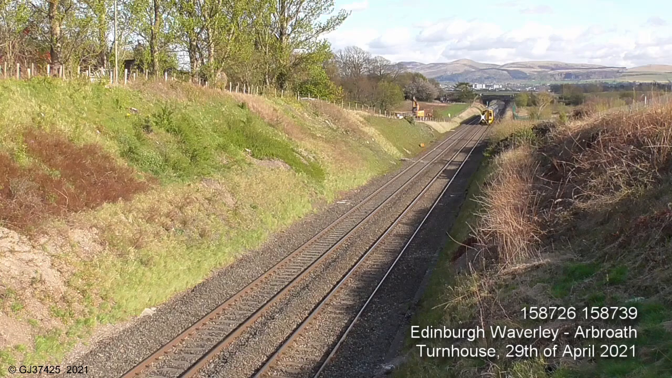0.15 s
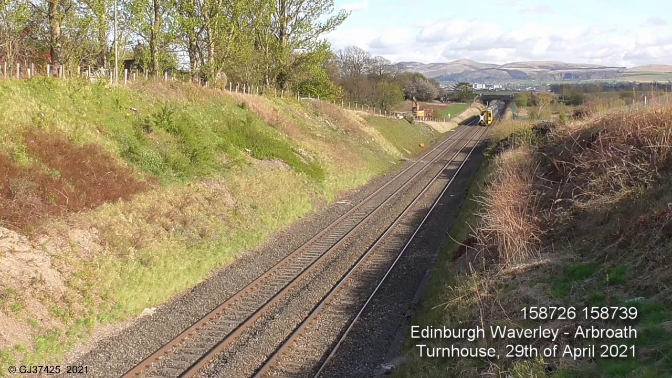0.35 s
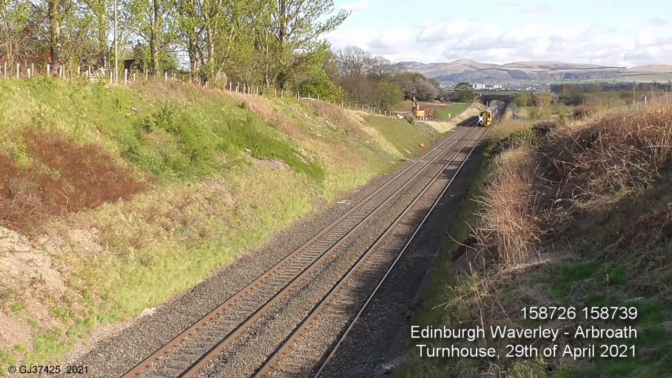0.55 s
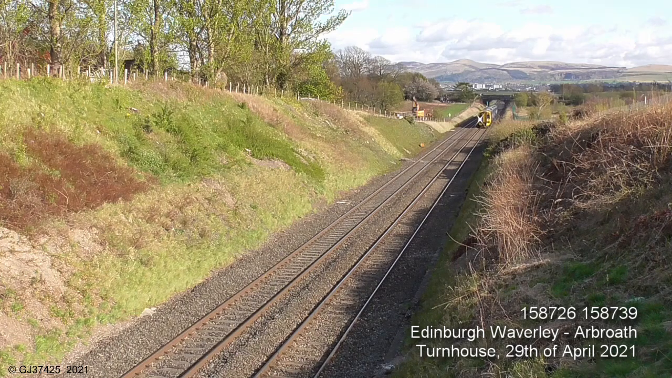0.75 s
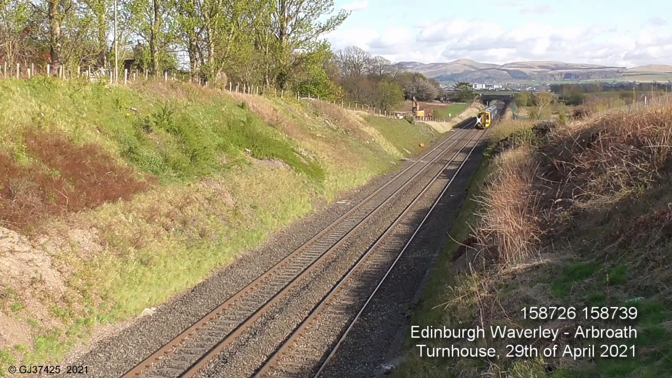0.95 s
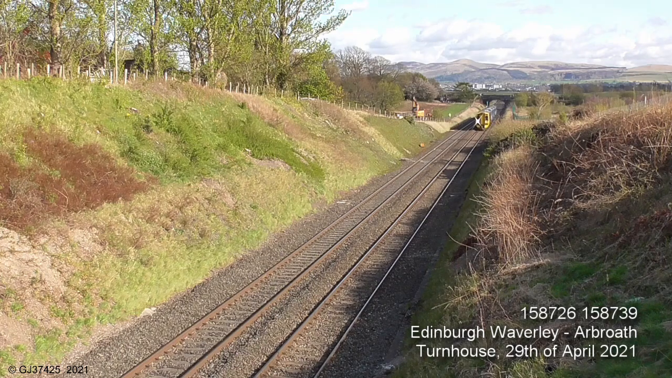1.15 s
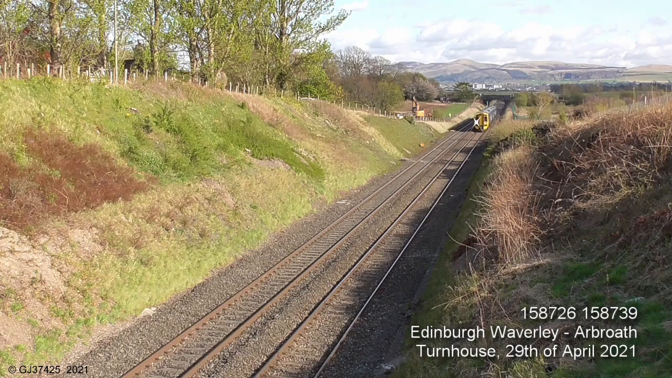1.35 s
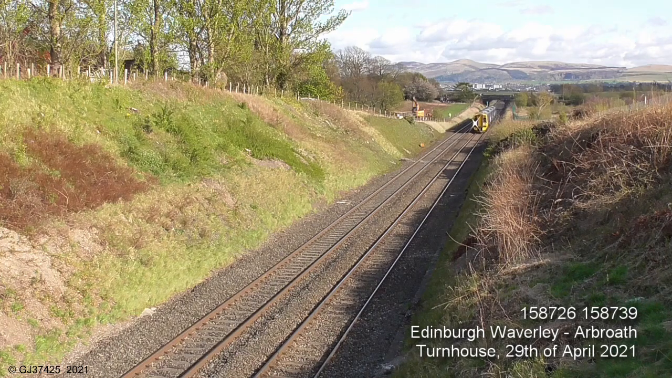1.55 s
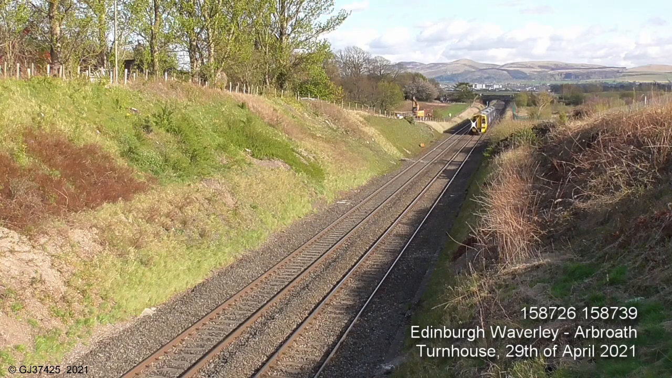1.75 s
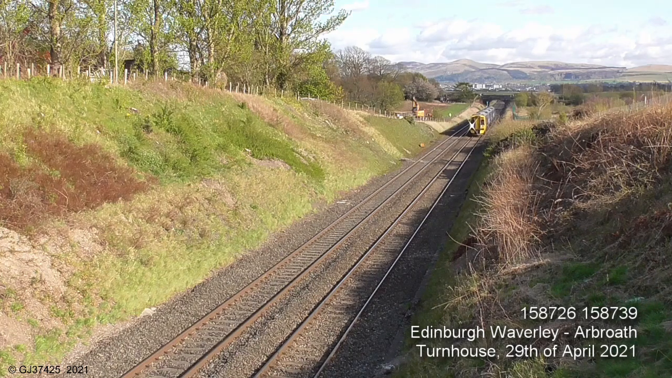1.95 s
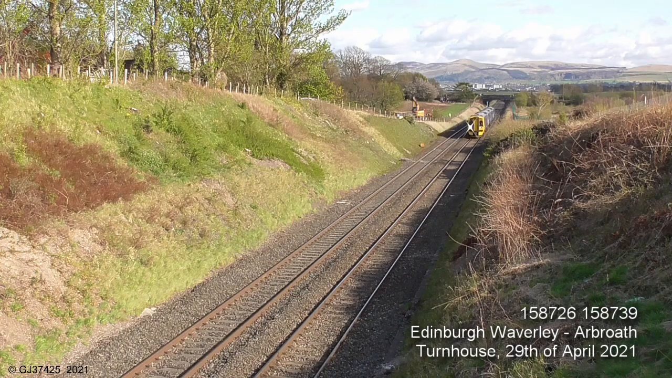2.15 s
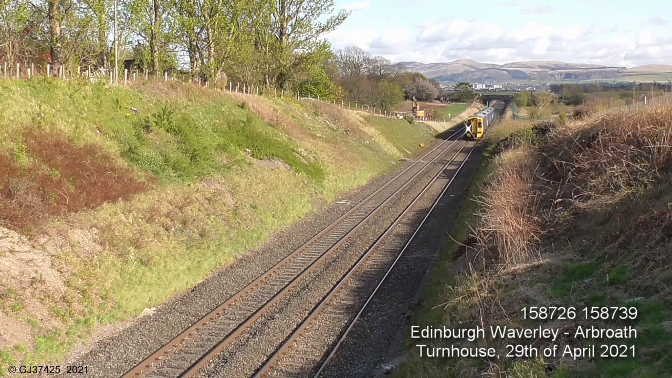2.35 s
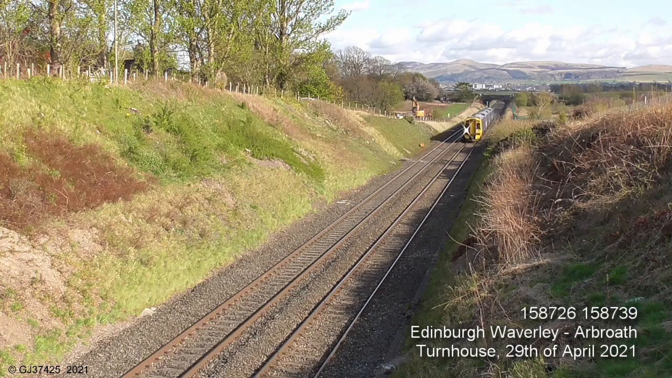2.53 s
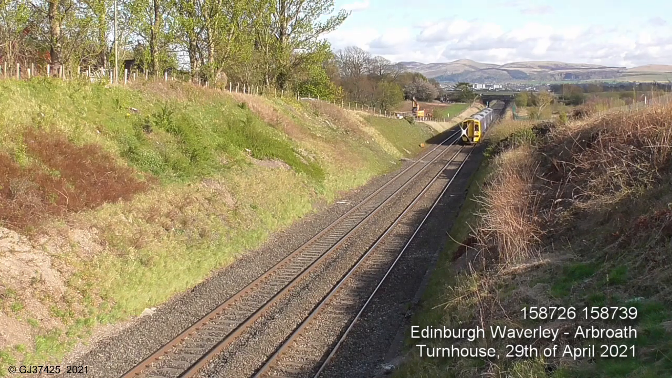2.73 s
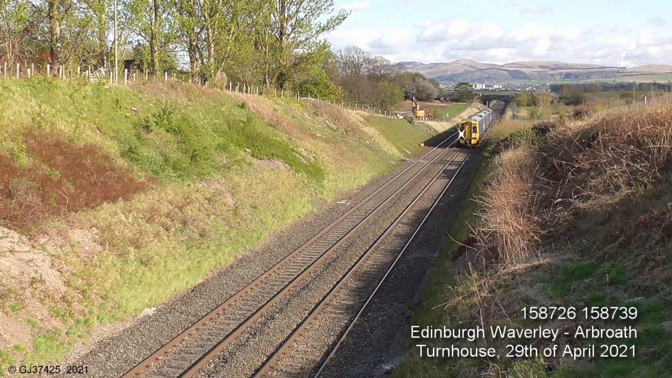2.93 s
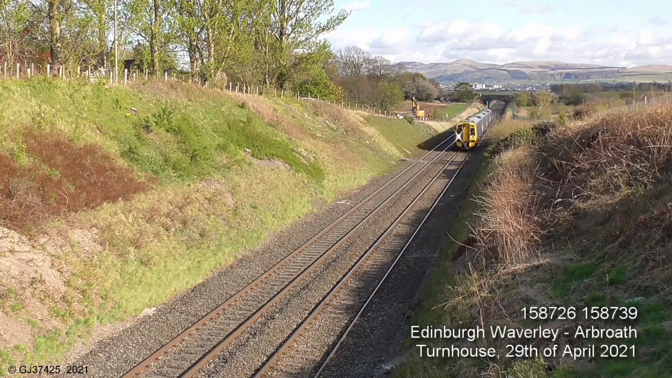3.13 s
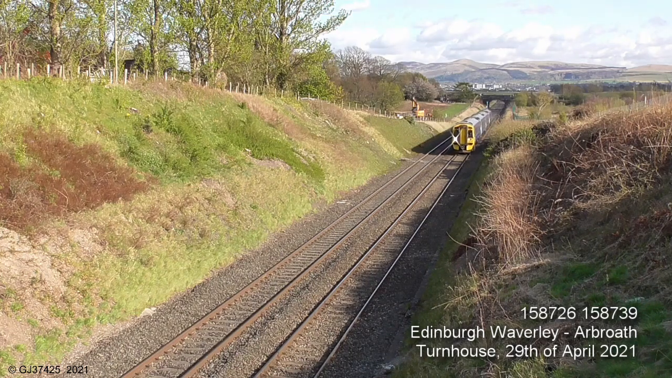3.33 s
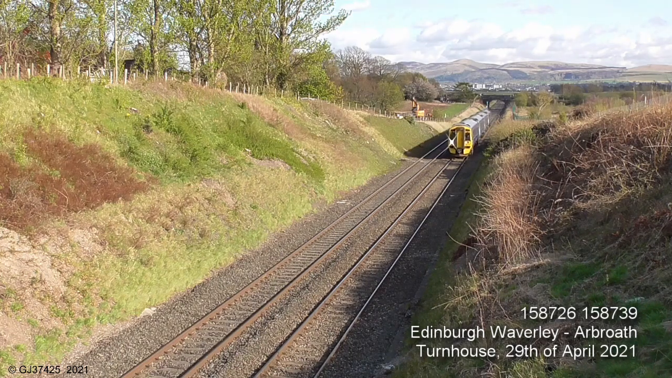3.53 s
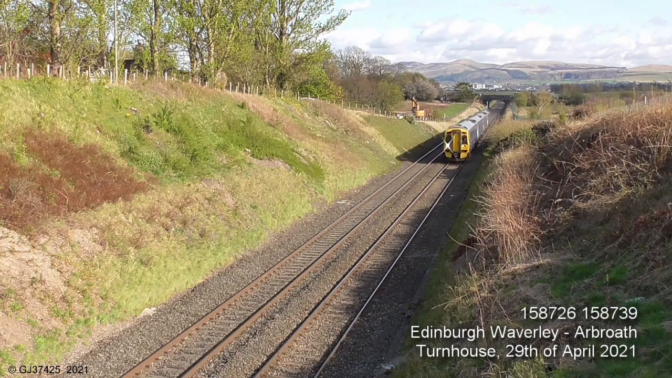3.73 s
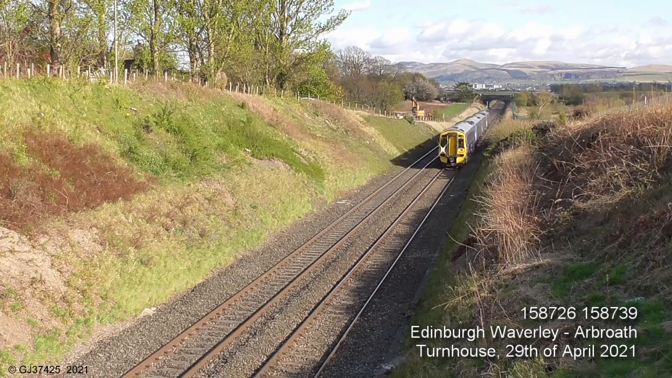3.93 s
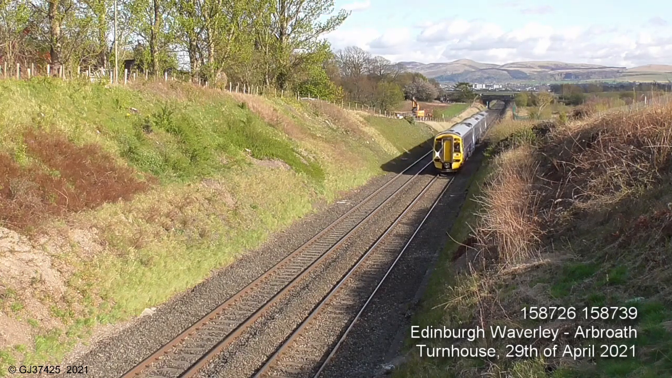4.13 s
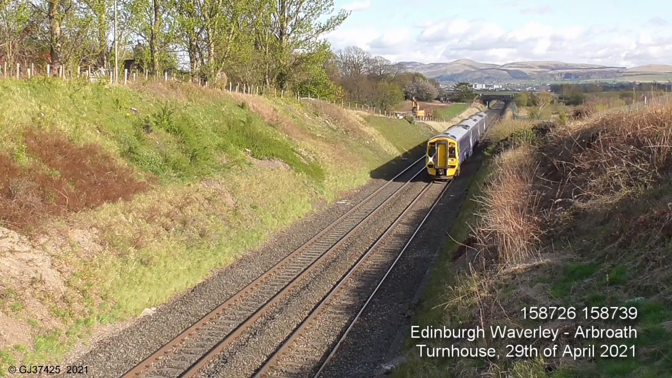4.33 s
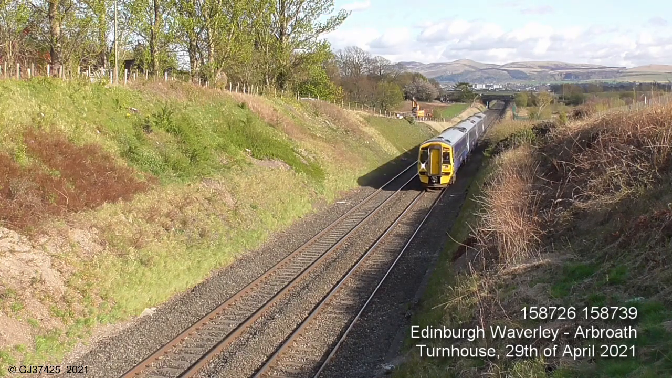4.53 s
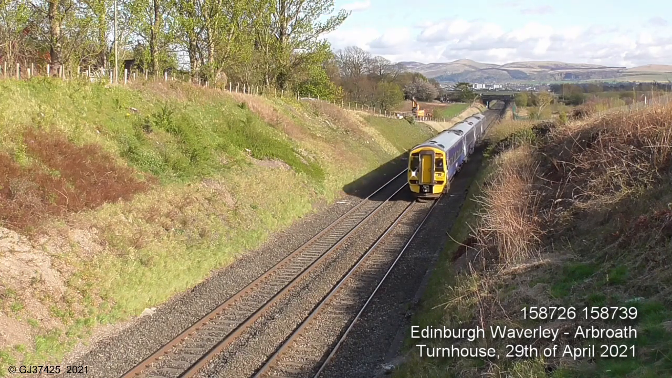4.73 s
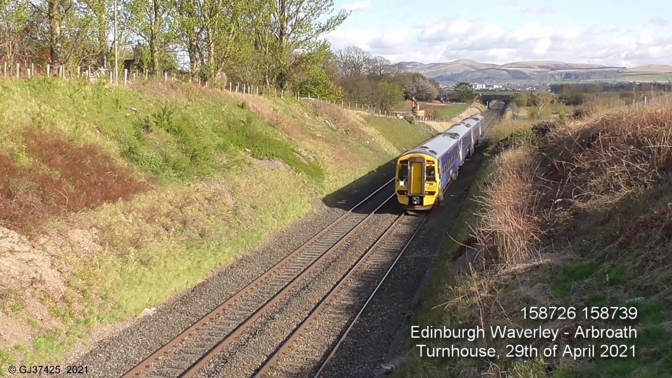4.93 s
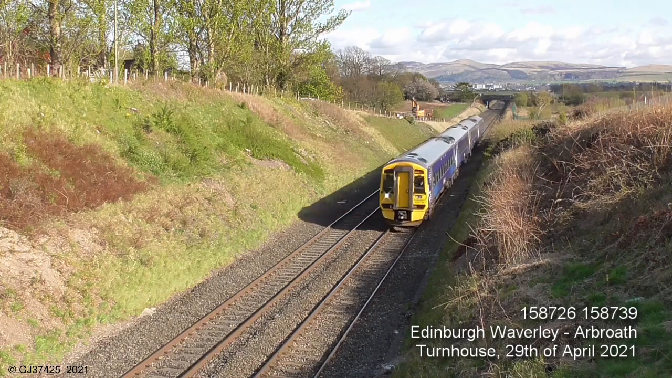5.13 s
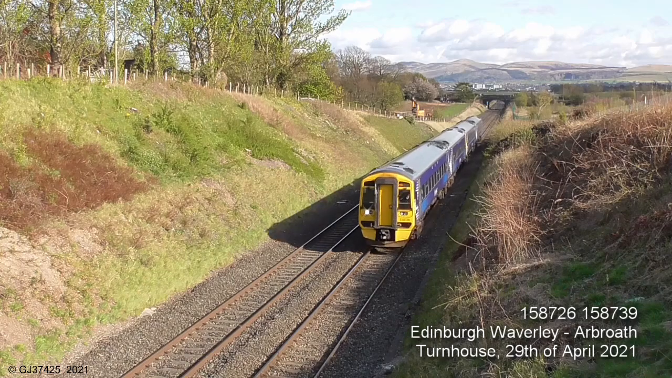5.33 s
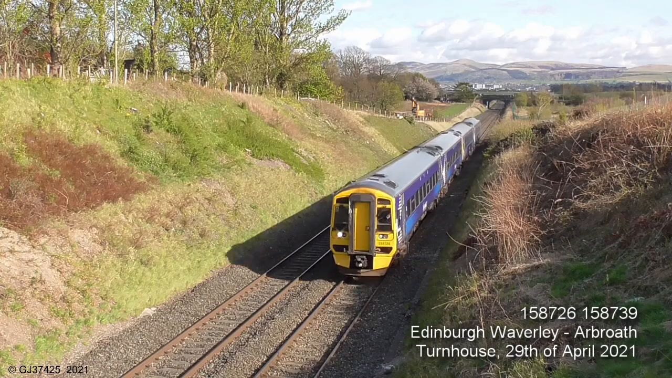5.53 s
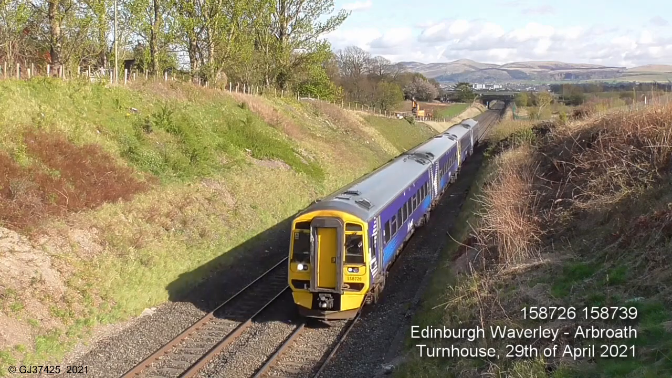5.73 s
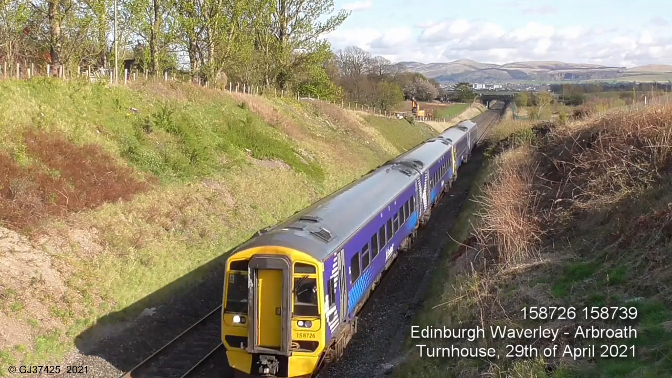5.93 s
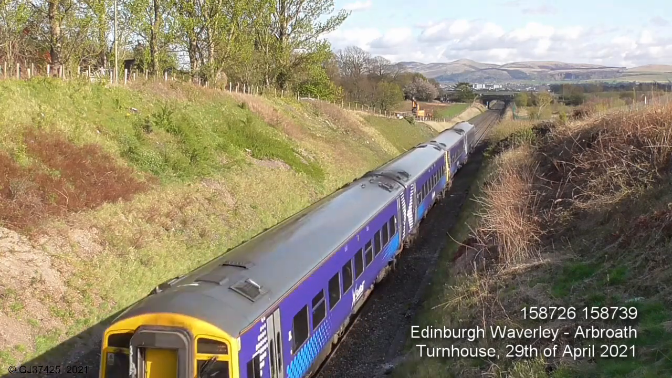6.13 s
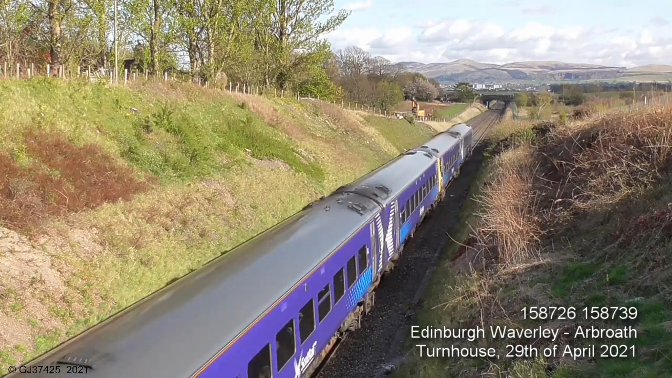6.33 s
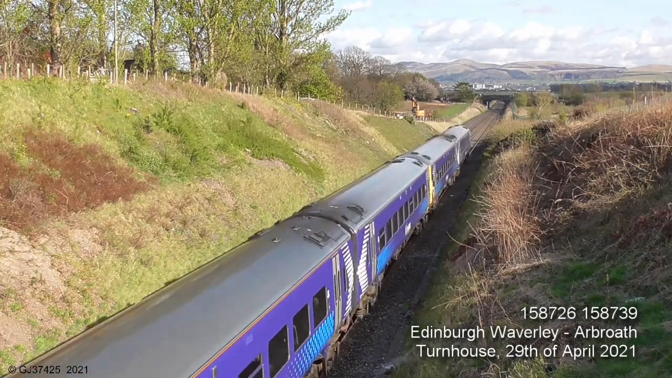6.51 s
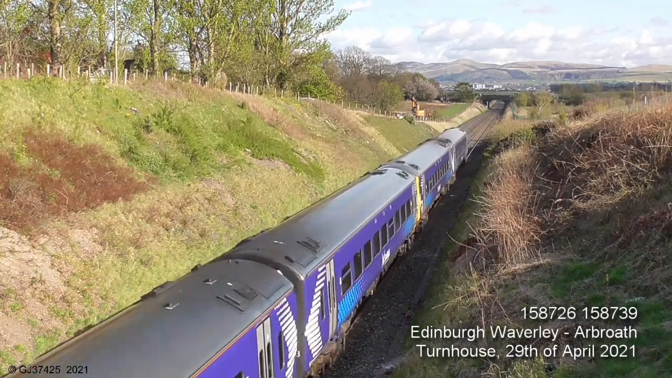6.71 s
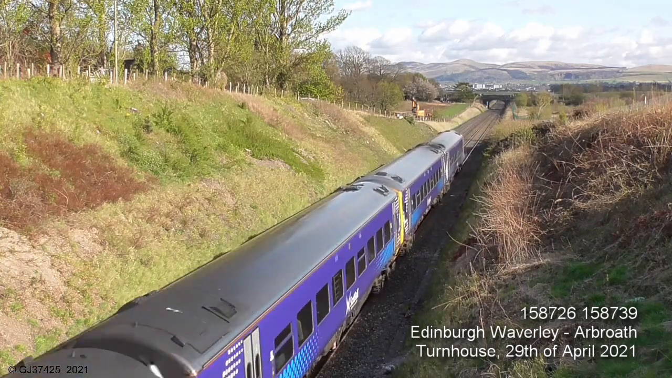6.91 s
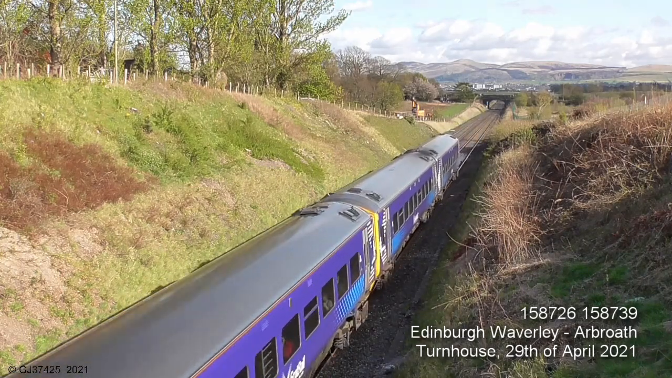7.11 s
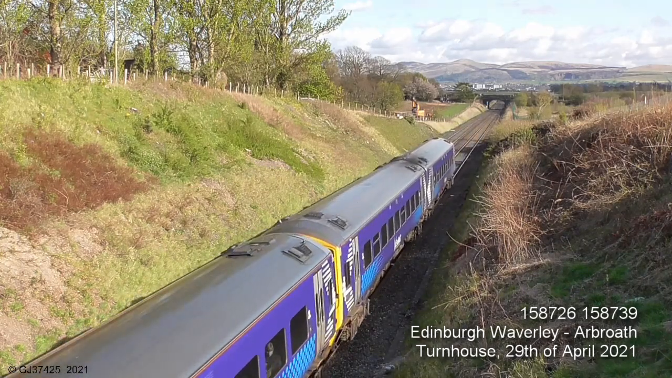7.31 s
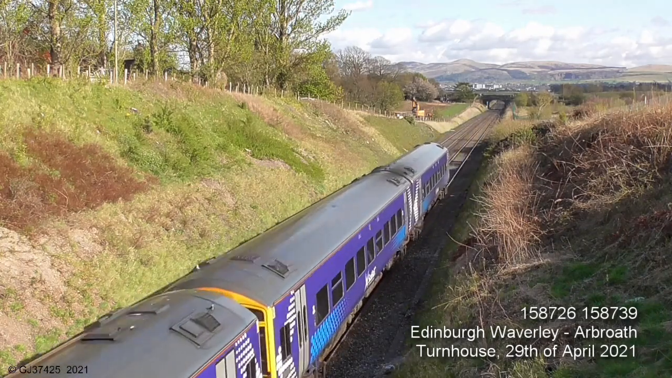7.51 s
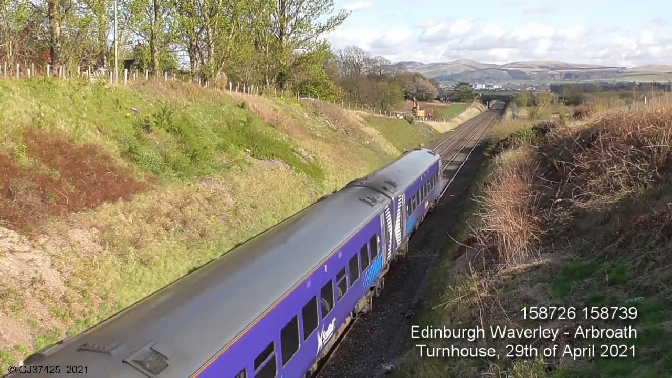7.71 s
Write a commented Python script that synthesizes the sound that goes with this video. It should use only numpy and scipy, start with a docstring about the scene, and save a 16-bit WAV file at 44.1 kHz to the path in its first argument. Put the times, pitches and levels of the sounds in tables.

```python
"""A train rumbles closer and runs under the listener: its rolling noise grows and brightens, its engines drone
and beat, and the rails sing. Low wind thumps come mostly early on; a camera close by fires six shots in a burst.
Rolling noise is built from random spectra that change colour with distance, and engines from sine waves.
Singing and whines are wavering tones; wind and camera clacks are shaped noise, with a body ring in the camera.
"""
import sys
import numpy as np
from scipy import signal
from scipy.fft import rfft, irfft
from scipy.io import wavfile
from scipy.ndimage import uniform_filter1d

SR = 44100
rng = np.random.default_rng(int(sys.argv[2]) if len(sys.argv) > 2 else 0)


def unload_wav(signal):
    """Save mono or channel-first audio to the path in sys.argv[1] as 16-bit WAV at rate SR, clipped to [-1, 1]."""
    wavfile.write(
        sys.argv[1],
        SR,
        np.round(np.clip(np.atleast_2d(signal).T, -1, 1) * 32767).astype(np.int16),
    )


N = 342216
EDGE_HZ = 15620  # upper limit of the whole sound

# Rumble, roll, wheel ring and hiss, one row each:
# (arrival t/s, arrival level/dB, growth before/(dB/s), drift after/(dB/s), level from afar/dB)
LAYERS = [(5.93, -41.5, 7.5, 5, -60.5), (6.115, -22.5, 4.5, -1, -46), (6, -33.5, 5, -1.6, -69.5),
          (6.5, -42, 7.5, -2.6, -69.5)]
# How much of each wheel-set swell, and of each broad surge, the four layers take [factor]
BOGIE_SHARES = [0.49, 0.7, 1.5, 0.56]
SURGE_SHARES = [0, 0.32, 0.94, 0.99]


def gain_of(db):
    """Turns decibels into a plain multiplier."""
    return 10 ** (np.asarray(db) / 20)


def evened(x):
    """Scales a signal to an rms (average strength) of 1."""
    return x / np.sqrt(np.mean(x ** 2) + 1e-20)


def read(points, hz):
    """Reads a curve of (f/Hz, value) points, with straight lines on a log frequency scale."""
    f, value = np.transpose(points)
    return np.interp(np.log(hz + 1), np.log(f + 1), value)


def coloured(x, points):
    """Filters x by a spectrum in dB."""
    hz = np.fft.rfftfreq(len(x), 1 / SR)
    return irfft(rfft(x) * gain_of(read(points, hz)), len(x))


def placed(mid, side, lean_db):
    """Left and right from a shared and an opposed part; a positive lean favours the left."""
    left = (mid + side) * gain_of(lean_db / 2)
    right = (mid - side) / gain_of(lean_db / 2)
    return np.array([left, right])


def bell(t, s, half):
    """A swell of height 1 around s."""
    return np.exp(-((t - s) / half) ** 2)


def held(t, start, end, rise, fall):
    """0 dB from start to end, sloping away on both sides."""
    return -rise * np.maximum(start - t, 0) - fall * np.maximum(t - end, 0)


def warble(hz, spread_hz, wobble_db, size):
    """A tone of rms 1 whose pitch and level stray at random, both smoothed over size samples."""
    stray, wobble = (evened(uniform_filter1d(x, size)) for x in rng.standard_normal((2, N)))
    turns = np.cumsum(hz + spread_hz * stray) / SR + rng.random()
    return evened(gain_of(wobble_db * wobble) * np.sin(2 * np.pi * turns))


def approach(t, layer, bogie_share, surge_share):
    """Level in dB of one rolling layer: it grows until arrival, with surges and wheel-set swells on top."""
    # wheel sets passing below: (t/s, swell/dB)
    bogies = [(5.861, -0.5), (6.202, 0), (6.85, 0.5), (7.09, 0.5), (7.6, 1.5)]
    bogie_half_s = 0.17
    # broad swells of the treble on the way in: (t/s, half width/s, swell/dB)
    surges = [(1.5, 1.65, 6.5), (5.65, 0.69, 3)]
    s, db, growth, drift, afar_db = layer
    bogie_db = sum(d * bell(t, at, bogie_half_s) for at, d in bogies)
    surge_db = sum(d * bell(t, at, half) for at, half, d in surges)
    near_db = db + np.where(t < s, growth, drift) * (t - s)
    near_db = near_db + bogie_share * bogie_db + surge_share * surge_db
    return 10 * np.log10(gain_of(2 * near_db) + gain_of(2 * afar_db))  # near and far powers add


def rolling(patchy_db=0.58, flicker_db=0.54, ringing_db=1.5):
    """Wheel-on-rail noise from random short-time spectra: colour moves with distance, layers have own levels."""
    # frequency bands of rumble, roll, wheel ring and hiss: (low f/Hz, high f/Hz)
    layers_hz = [(105, 165), (260, 1700), (1700, 5800), (5800, 15600)]
    # relative noise colour when far, closing in and below, each (body, treble) of (f/Hz, level/dB per Hz)
    far, closing, below = ([(24, -40), (45, -24), (75, -11.5), (130, -19), (230, 3.5), (320, 3), (620, 2),
                           (710, 2), (780, 3.5), (1200, 5), (1450, 0.5), (1700, -7.5)], [(1000, -32),
                           (1700, -0.5), (2180, 1), (2530, -7.5), (4020, -10.5), (5010, -18), (6320, -38.5),
                           (7320, -26), (8030, -36), (9250, -29), (9620, -27.5), (10150, -31), (11500, -26),
                           (12900, -25), (15500, -39)]), ([(24, -45), (45, -10), (80, -7), (130, -7), (230, 1.5), (330, 5),
                                        (450, -2), (720, -3.5), (790, 2), (850, 1), (1250, 1.5),
                                        (1700, -7)], [(1000, -41.5), (1700, -9.5), (1850, -6), (2120, -2),
                                        (2480, -11.5), (3980, -11), (4790, -14), (6320, -22.5),
                                        (8890, -19.5), (11800, -23), (13600, -30), (14300, -46),
                                        (14800, -62), (15500, -70)]), ([(24, -49), (45, -30), (75, -11), (130, -9),
                                                         (230, 2.5), (365, -1), (440, 3), (560, -3.5),
                                                         (900, -3), (1250, -4), (1700, -15.5)],
                                                         [(1030, -35), (1750, 0), (2180, 4), (2280, -1.5),
                                                         (2570, -7), (4090, -5), (4910, -8), (5280, -11.5),
                                                         (6270, -16), (8560, -16.5), (12100, -16.5),
                                                         (13900, -24), (15500, -39)])
    # when each of the three colours is reached: (t/s)
    stages_s = [2.1, 5.53, 7.23]
    # unrelated part between the ears, against the middle: (f/Hz, level/dB)
    width = [(60, -11), (110, -17), (200, -15.5), (380, -23.5), (700, -16), (1290, -16), (2380, -13),
             (4400, -9.5), (8120, -3), (15000, -6.5)]
    # left minus right, far and near: (f/Hz, level/dB)
    lean_far, lean_near = [(60, 5), (180, -2.5), (550, -4), (1650, -1), (4970, -1.5), (15000, -1.5)], [(60, -0.5), (180, -0.57), (550, -1.4), (1650, 0.94),
                                             (4970, 0.066), (15000, -1.0)]
    # broad swells and dips:
    # (t/s, half width before/s, half width after/s, centre f/Hz, half width/octaves, level/dB)
    blooms = [(5.5, 0.13, 0.12, 3700, 0.41, 2), (6.5, 0.089, 0.37, 1080, 0.39, 3),
              (7.13, 0.51, 0.28, 580, 0.92, 5), (7.62, 0.18, 0.25, 1140, 0.96, 4.5),
              (2.83, 0.44, 0.71, 4000, 0.56, -3), (6.2, 0.29, 0.45, 630, 0.43, -2),
              (4, .4, 0.35, 6800, 0.94, 3)]
    airy_s, airy_half_s, airy_db, airy_hz = 6.53, 0.47, 18, 12500  # the top of the hiss swells once

    hop, size = 512, 4096  # samples
    t = np.arange(N // hop + 5) * hop / SR
    hz = np.fft.rfftfreq(size, 1 / SR)
    a, b, c, d, patches, ringing = rng.standard_normal((len(t), len(hz), 6)).T

    # blend the colours, then lift each band to its wanted level
    share = [np.interp(t, stages_s, row) for row in np.eye(3)]
    colour_db = 0
    for (body, treble), w in zip((far, closing, below), share):
        spectrum_db = np.where(hz < layers_hz[2][0], read(body, hz), read(treble, hz))
        colour_db = colour_db + np.outer(spectrum_db, w)
    power = gain_of(2 * colour_db)
    wanted_db = [approach(t, *row) for row in zip(LAYERS, BOGIE_SHARES, SURGE_SHARES)]
    lift_db = np.array([db - 10 * np.log10(power[(hz >= lo) & (hz < hi)].sum(0))
                        for db, (lo, hi) in zip(wanted_db, layers_hz)])
    layer = np.searchsorted([hi for lo, hi in layers_hz[:-1]], hz)
    lift_db = uniform_filter1d(lift_db[layer], size=3, axis=0)

    airy = np.clip((hz - airy_hz) / (EDGE_HZ - airy_hz), 0, 1)
    lift_db += airy_db * np.outer(airy, bell(t, airy_s, airy_half_s))
    for s, before, after, centre_hz, octaves, db in blooms:
        over_hz = bell(np.log2(hz + 1), np.log2(centre_hz), octaves)
        over_time = bell(t, s, np.where(t < s, before, after))
        lift_db += db * np.outer(over_hz, over_time)

    patches = evened(uniform_filter1d(uniform_filter1d(patches, size=30, axis=0), size=6, axis=1))
    # narrow bands that linger
    ringing = evened(uniform_filter1d(uniform_filter1d(ringing, size=4, axis=0), size=50, axis=1))
    # small random level flicker, in all bands at once
    flicker = evened(uniform_filter1d(rng.standard_normal(len(t)), size=3))
    uneven_db = patchy_db * patches + ringing_db * ringing + flicker_db * flicker
    level = gain_of(colour_db + lift_db + uneven_db)

    nearness = share[2] + share[1] / 2
    lean_db = np.outer(read(lean_far, hz), 1 - nearness) + np.outer(read(lean_near, hz), nearness)
    side = gain_of(read(width, hz))[:, None] * (c + 1j * d)
    frames = placed(a + 1j * b, side, lean_db) * level
    scale = np.sqrt(3)  # overlapping random frames partly cancel
    return scale * signal.istft(frames, nperseg=size, noverlap=size - hop)[1][:, :N]


def beating(t):
    """Gain of the octave tone, whose beats follow listed arches: full at the tops, sunk in the gaps."""
    # one arch from gap to gap: (gap t/s, next top t/s, gap depth/dB, rms at the top/dB)
    beats = [(.14, .38, -20, -49), (.72, .95, -22, -47.5), (1.22, 1.5, -18, -46), (1.84, 2.09, -14, -43),
             (2.38, 2.65, -12, -40.5), (3.02, 3.2, -13, -39), (3.54, 3.74, -16, -36),
             (4.04, 4.32, -3.5, -35), (4.64, 4.9, -14, -33), (5.17, 5.41, -12, -29.5), (5.7, 5.94, -9, -29),
             (6.2, 6.5, -13, -26), (6.76, 7.02, -18, -26)]
    pointed = 2.2  # power that narrows the arches
    gone_s, gone_db_per_s, end_db = 7.55, 40, -33  # end level before the final fade is added
    gap, top, depth_db, top_db = np.transpose(beats)
    turns = np.interp(t, np.ravel([gap, top], "F"), np.arange(2 * len(gap)) / 2)
    low = gain_of(np.interp(t, gap, depth_db))
    arch = low + (1 - low) * abs(np.sin(np.pi * turns)) ** pointed
    level_db = np.interp(t, [*top, N / SR], [*top_db, end_db])
    return arch * gain_of(level_db + held(t, 0, gone_s, 0, gone_db_per_s))


def engines(lean_db=-1.5):
    """Exhaust tones of three engines: in the twelfth and growl, small speed differences make beats."""
    # twelfth and growl, one row each:
    # (starting level/dB, growth/(dB/s), lift on arrival/dB, swell as one engine passes/dB)
    tone_levels = [(-62.5, 4, -2, 8), (-81.5, 6, 4, 17.5)]
    # unequal cylinders, {thirds of the firing rate: level against the growl/dB}
    growl = {2.5: -9, 5: -4, 7: -5, 8: 4, 11: -5, 14: -8, 15: -4, 20: -8}
    # level of the firing tone: (t/s, rms/dB)
    hum = [(0.0, -65), (0.43, -59), (0.71, -68), (0.75, -55), (1.79, -61), (2.12, -52.5), (2.87, -62.5),
           (3.35, -52.5), (3.54, -54), (3.59, -53), (3.87, -55), (3.91, -67), (4.04, -50), (4.32, -46),
           (4.84, -60.5), (4.93, -46), (5.06, -65), (5.14, -48.5), (5.64, -40), (5.79, -58), (5.92, -41),
           (6.44, -29.5), (6.92, -34), (7.07, -53), (7.09, -49), (7.26, -32), (7.3, -38), (7.35, -27),
           (7.39, -36), (7.65, -26.5), (7.72, -35), (7.76, -32)]
    firing_hz, climb_hz_per_s = 90.26, .33
    pass_s, drop_hz, drop_half_s = 7.2, 3.2, 0.16  # the pitch drops in passing
    sag_s, sag_hz, sag_half_s = 7.33, 2.5, .06  # and briefly sags further
    arrive_s, arrive_half_s = 5.58, 0.71
    swell_rise_s, swell_end_s, swell_fall_s = 0.2, 7.35, 0.046  # slow swell, sharp cut-off
    head_start, beat_hz, beat_hz_per_s = -1.814, .835, .02  # second engine's lead in firings, and its gain
    second, drowned = .82, .95  # strength of the others; share of it lost while the first passes
    third, third_lead = 0.22, 0.48  # gains twice as fast: strength against the second, lead in turns per tone
    octave_swell_db = 9

    t = np.arange(N) / SR
    dropped = (1 + np.tanh((t - pass_s) / drop_half_s)) / 2
    hz = firing_hz + climb_hz_per_s * t - drop_hz * dropped - sag_hz * bell(t, sag_s, sag_half_s)
    arrived = (1 + np.tanh((t - arrive_s) / arrive_half_s)) / 2
    swelling = bell(np.minimum(t, pass_s), pass_s, swell_rise_s)
    ending = bell(np.maximum(t, swell_end_s), swell_end_s, swell_fall_s)
    passing = swelling * ending
    twelfth_db, growl_db = (db + growth * np.minimum(t, arrive_s) + lift * arrived + swell * passing
                            for db, growth, lift, swell in tone_levels)

    gained = head_start + (beat_hz + beat_hz_per_s * t / 2) * t
    strength = second * (1 - drowned * passing)
    drift = evened(uniform_filter1d(rng.standard_normal(N), size=4000))
    turns = np.cumsum(hz * (1 + .002 * drift)) / SR

    firing = gain_of(np.interp(t, *np.transpose(hum)))
    octave = beating(t) * gain_of(octave_swell_db * passing)
    firing_tone = firing * np.sin(2 * np.pi * turns)
    octave_tone = octave * np.sin(2 * np.pi * (2 * turns + rng.random()))
    mid = np.sqrt(2) * (firing_tone + octave_tone)  # from rms to peak

    orders = [(3, twelfth_db)] + [(k / 3, growl_db + db) for k, db in growl.items()]
    for (k, db), start in zip(orders, rng.random(len(orders))):
        first, step = k * turns + start, k * gained
        others = np.sin(2 * np.pi * (first + step))
        others = others + third * np.sin(2 * np.pi * (first + 2 * step + third_lead))
        mid = mid + gain_of(db) * (np.sin(2 * np.pi * first) + strength * others)
    return placed(mid, 0, lean_db)


def wind(mid_db=-9):
    """Wind buffets the microphone: lumpy low noise, mostly opposed between left and right."""
    # relative colour of the noise: (f/Hz, level/dB per Hz)
    buffet = [(12, -41), (20, -11), (50, -0.5), (112, 2.5), (177, 0), (312, -24), (382, -21), (500, -27),
              (650, -62), (1100, -120)]
    # gusts: (start t/s, hold/s, level/dB)
    gusts = [(.02, 0.43, -50.5), (0.736, 0.216, -39.5), (1.053, 0.2, -43), (1.5, 0.13, -44),
             (2.15, .1, -65), (4.648, 0.031, -47), (4.9, .1, -61)]
    rise_db_per_s, fall_db_per_s, calm_db = 200, 130, -63
    lumps = evened(uniform_filter1d(uniform_filter1d(rng.standard_normal(N), size=1200), size=1200))
    lumps = evened(gain_of(2.2 * lumps))
    mid, side = (evened(coloured(x, buffet)) for x in rng.standard_normal((2, N)))
    t = np.arange(N) / SR
    strength = gain_of(calm_db)
    for s, hold, db in gusts:
        strength = strength + gain_of(db + held(t, s, s + hold, rise_db_per_s, fall_db_per_s))
    return lumps * strength * placed(gain_of(mid_db) * mid, side, 0)


def whines():
    """Thin lasting tones, fuzzy in pitch and level, and one faint short whistle."""
    # lasting tones: (f/Hz, rms/dB)
    whine_tones = [(1857, -61), (2073, -71), (3090, -89), (7407, -84.5), (7601, -86), (11300, -84)]
    chirp_s, chirp_half_s, chirp_hz, chirp_db = .2, .18, 2585, -69
    chirp = warble(chirp_hz, spread_hz=8.2, wobble_db=-2.0, size=800)
    chirp = gain_of(chirp_db) * bell(np.arange(N) / SR, chirp_s, chirp_half_s) * chirp
    return chirp + sum(gain_of(db) * warble(hz, spread_hz=11, wobble_db=4.5, size=1500)
                       for hz, db in whine_tones)


def singing(lean_db=0.0, side_db=-16, wobble_db=3.5):
    """Rough wheels keep narrow rail resonances sounding; most of them glide in pitch."""
    # songs of rails and wheels: (full from t/s, until t/s, pitch f/Hz, climb/(Hz/s), spread f/Hz,
    # level against the roll/dB, rise/(dB/s), fall/(dB/s))
    songs = [(3.0, 5.8, 748, 12, 7, -8, 5, 40), (6.5, 7.7, 890, 40, 45, -10, 20, 5),
             (4.3, 5.9, 1215, 0.6, 18, -11, 5, 6), (2.6, 3.7, 1185, 8, 12, -14, 5, 12),
             (3.7, 4.6, 1255, -10, 12, -14, 10, 10), (5, 6.7, 1125, 0.6, 12, -14, 8, 25),
             (4.9, 5.95, 830, 22, 12, -11, 12, 25), (4.45, 5.9, 2075, 45, 16, -13, 25, 30),
             (3.95, 4.35, 2120, -60, 14, -16, 40, 30), (5.7, 6.5, 2255, 3, 45, -17, 6, 8),
             (5.45, 5.7, 2784, 0, 16, -21, 14, 30), (5.05, 5.2, 2950, 0, 14, -24, 30, 30),
             (5.3, 5.7, 4620, 0, 30, -25, 20, 15), (5.35, 5.8, 1265, 0, 12, -15, 15, 20),
             (5.6, 6.1, 880, 60, 20, -14, 15, 20)]
    t, out = np.arange(N) / SR, 0
    roll_db = approach(t, LAYERS[1], BOGIE_SHARES[1], SURGE_SHARES[1])
    for start, end, pitch, climb, spread, db, rise, fall in songs:
        hz = pitch + climb * np.maximum(t - start, 0)
        mid = warble(hz, spread, wobble_db, size=350)
        side = gain_of(side_db) * np.roll(mid, shift=SR // 20)  # a copy 50 ms later widens it
        level = gain_of(roll_db + db + held(t, start, end, rise, fall))
        out = out + level * placed(mid, side, lean_db)
    return out


def camera(side_db=-5):
    """Mirror up, curtain and mirror down: each stroke is clacks with a body ring, some with a longer tail."""
    # shots: (curtain t/s, curtain peak/dB, mirror up peak/dB, mirror down peak/dB)
    shots = [(3.7534, -27.5, -34, -26), (4.085, -25, -33.5, -27), (4.4179, -25, -35, -27),
             (4.75, -24, -35, -27.5), (5.0833, -24, -32, -29), (5.4166, -22, -31, -27)]
    # what follows each stroke:
    # (delay/s, level against the peak/dB, rise/s, time to fall 60 dB/s, body ring in it/dB)
    up_rattle, curtain_rattle = [(0, -7, .001, .016, -8), (.008, -12, .001, .016, -8),
                                 (.02, -9, .001, .016, -12), (0, -14, .01, .25, -20)], [(0, -6, .0015, .012, -12), (.007, -22, .001, .03, -20)]
    down_rattle = [(0, -5, .0005, .013, -4), (.0105, -16, .002, .016, 4), (.018, -25, .002, .04, -4),
                   (.004, -21, .006, .3, -12)]
    # relative colour of the clacks: (f/Hz, level/dB)
    clack_colour = [(1500, -6), (4000, 4), (6500, -4), (9000, -2), (11500, 0), (13300, -1), (14400, -10),
                    (15600, -26)]
    up_s, down_s, first_later_s = -.0775, .049, .0056  # mirror against curtain; from rest it leads by less
    body_hz, body_spread_hz, lean_db = 10550, 220, -6.5

    clack, other = (evened(coloured(x, clack_colour)) for x in rng.standard_normal((2, N)))
    ring = warble(body_hz, body_spread_hz, wobble_db=3.5, size=60)
    t, plain, rung = np.arange(SR // 4) / SR, np.zeros(N), np.zeros(N)
    for k, (shot, shot_db, up_db, down_db) in enumerate(shots):
        up = shot + up_s + first_later_s * (k == 0)
        strokes = [(up, up_db, up_rattle), (shot, shot_db, curtain_rattle),
                   (shot + down_s, down_db, down_rattle)]
        for s, peak_db, rattle in strokes:
            for delay, db, rise, t60, ring_db in rattle:
                at = round((s + delay) * SR)
                shape = gain_of(peak_db + db - 60 * t / t60) * np.minimum(t / rise, 1)
                plain[at:at + len(t)] += shape
                rung[at:at + len(t)] += shape * gain_of(ring_db)
    mid = plain * clack + rung * ring
    return placed(mid, gain_of(side_db) * plain * other, lean_db)


def scene():
    """All the sounds together."""
    return rolling() + engines() + wind() + whines() + singing() + camera()


def record(dry):
    """The band limit: a steep filter takes away what lies above the edge."""
    lowpass = signal.firwin(511, EDGE_HZ, window=("kaiser", 9), fs=SR)
    return signal.oaconvolve(dry, lowpass[None], "same")


dry = scene()
out = record(dry)
unload_wav(out)
```